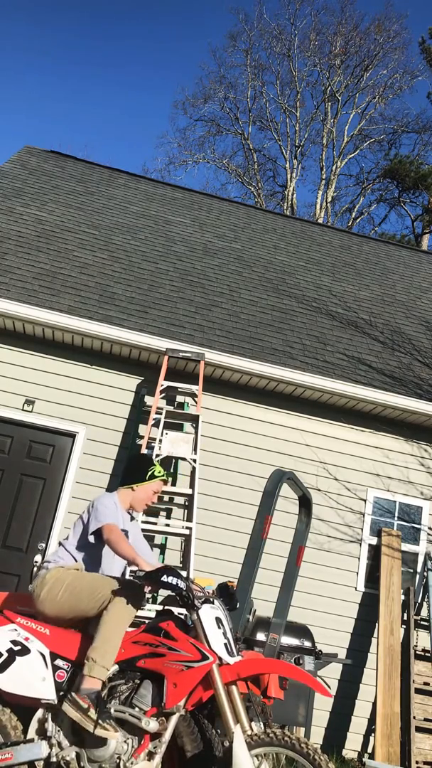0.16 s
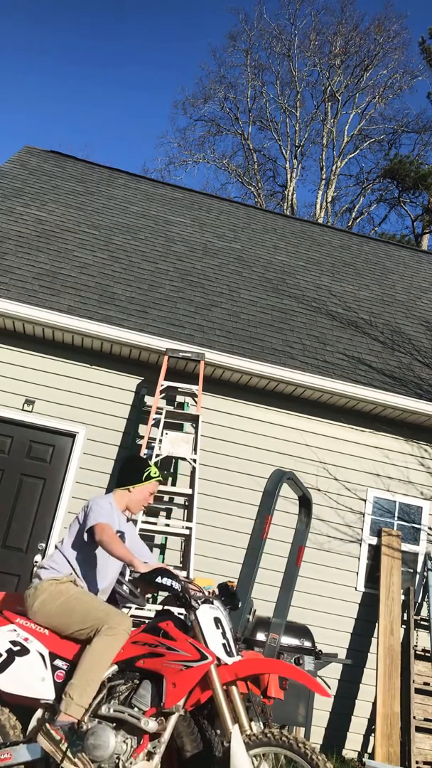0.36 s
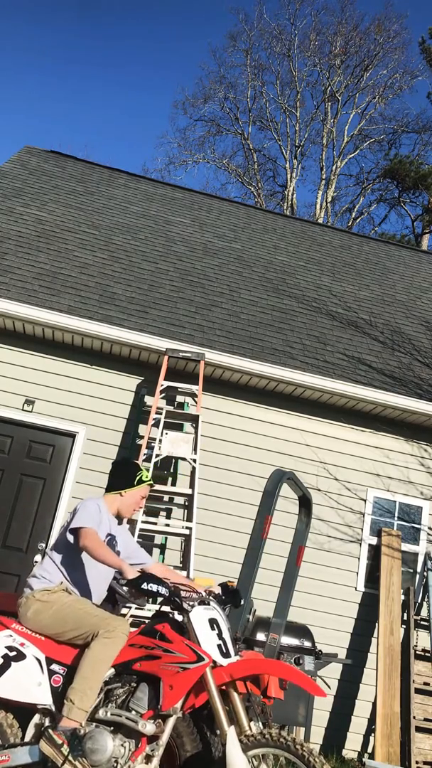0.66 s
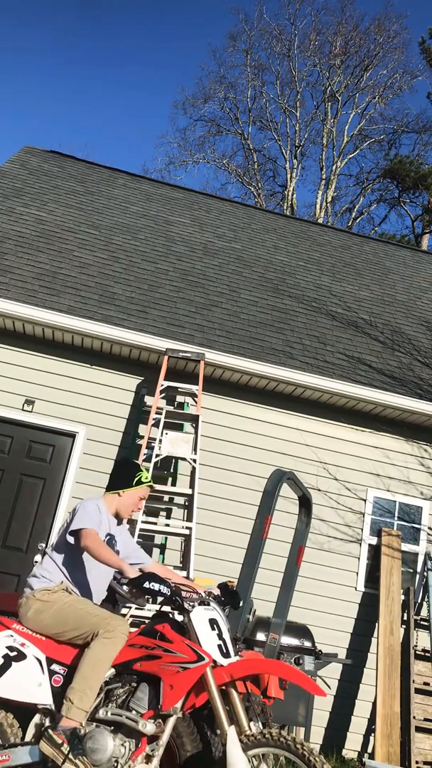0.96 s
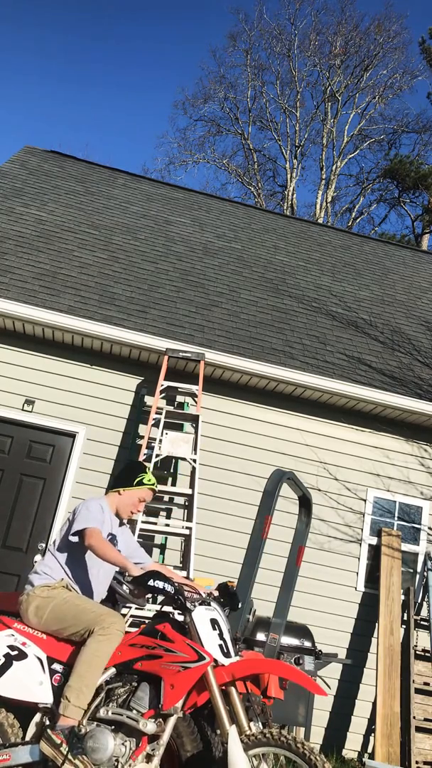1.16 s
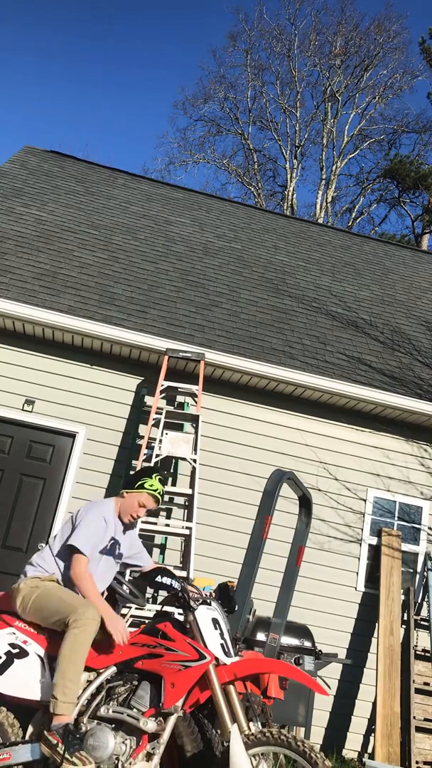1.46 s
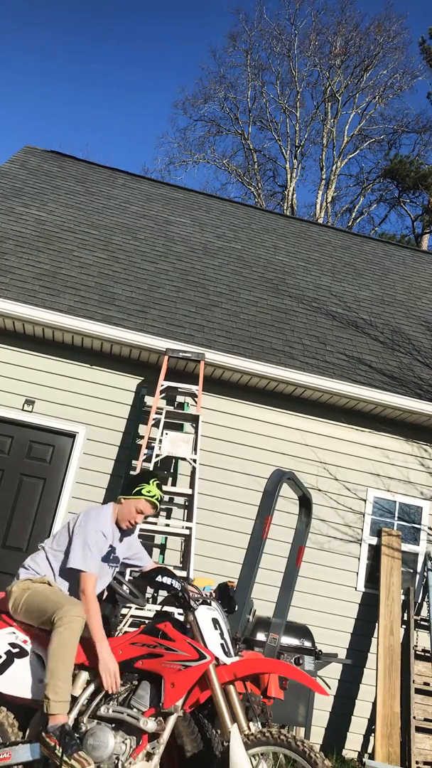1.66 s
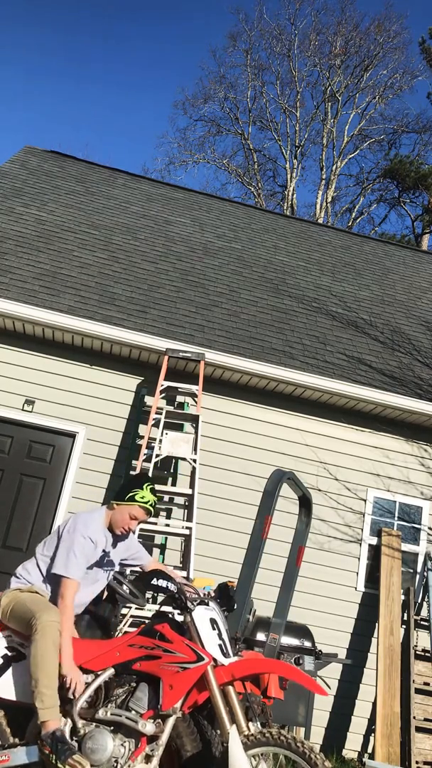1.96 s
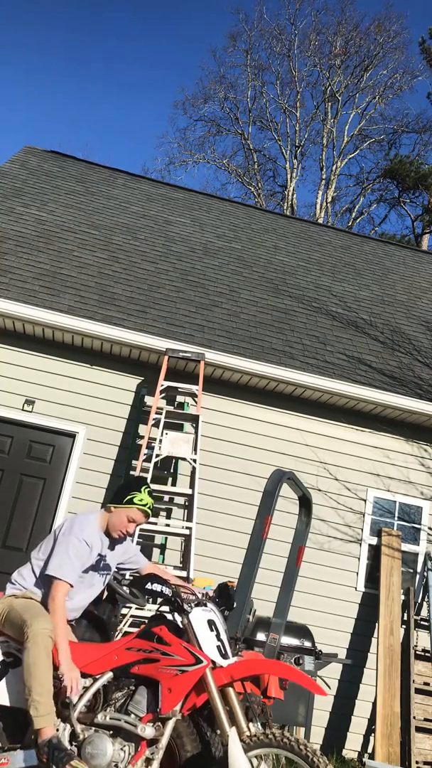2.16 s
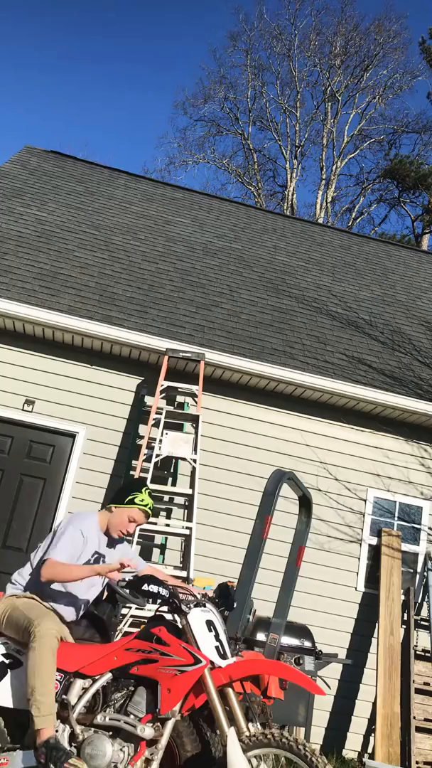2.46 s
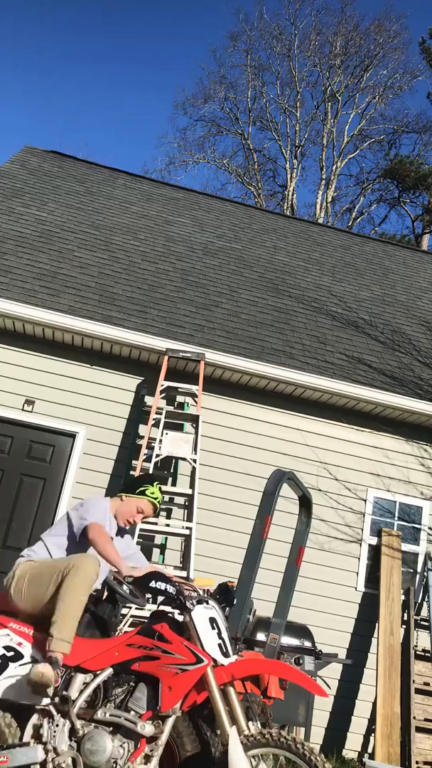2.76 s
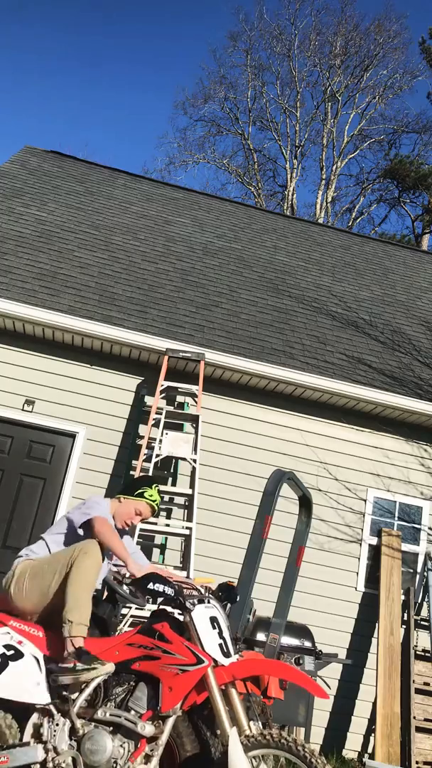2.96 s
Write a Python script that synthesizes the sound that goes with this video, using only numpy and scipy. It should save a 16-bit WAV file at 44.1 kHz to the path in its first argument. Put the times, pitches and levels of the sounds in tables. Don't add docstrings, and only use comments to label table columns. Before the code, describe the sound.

A small single-cylinder motorcycle engine is already turning at 0 s, punching fast, boomy exhaust thumps with valve clacks and gear chatter, slowing until it dies around 0.6 s with a bright, briefly ringing lever clank. Faint taps and cloth brushes follow near 1.2-1.4 s, a stick-slip seat creak at 1.6-1.85 s, then dull knocks at 2.0-2.55 and about 3 s. Low traffic hum fades; faint camera whine and ticks persist close by.

```python
import sys
import numpy as np
from scipy import signal
from scipy.fft import rfft, irfft, next_fast_len
from scipy.io import wavfile
from scipy.ndimage import uniform_filter1d, map_coordinates

SR = 44100
rng = np.random.default_rng(int(sys.argv[2]) if len(sys.argv) > 2 else 0)


def how_loud(loudness_db):
    steps = np.asarray(loudness_db, float) / 20
    return 10 ** steps


def int16_out(signal):
    q = np.round(np.clip(np.atleast_2d(signal).T, -1, 1) * 32767)
    wavfile.write(sys.argv[1], SR, q.astype(np.int16))


N = 136710
TIME = np.arange(N) / SR


def unit(x):
    return x / np.sqrt(np.mean(x ** 2) + 1e-20)


def filtered(x, response):
    size = next_fast_len(x.shape[-1] + SR // 2)
    hz = np.fft.rfftfreq(size, 1 / SR)
    return irfft(rfft(x, size) * response(hz), size)[:x.shape[-1]]


def resonant(x, peaks):
    def response(f):
        total = 0
        for k, (centre, width, db) in enumerate(peaks):
            damping = 1j * f * width
            total = total + (-1) ** k * how_loud(db) * damping / (centre * centre - f * f + damping)
        return total
    return filtered(x, response)


def wobble(rate):
    return map_coordinates(rng.standard_normal(int(N * rate / SR) + 4), [TIME * rate])


def hiss(spectrum, patchy_db):
    z = signal.stft(rng.standard_normal(N + 512), nperseg=512)[2]
    patches = uniform_filter1d(uniform_filter1d(rng.standard_normal(z.shape), 6, 0), 8, 1)
    x = signal.istft(z * how_loud(patchy_db * unit(patches)), nperseg=512)[1][:N]
    below = [(spectrum[0][0] * 0.25, -120)]
    above = [(spectrum[-1][0] * 1.3, -120)]
    hz, db = np.transpose(below + list(spectrum) + above)
    return unit(filtered(x, lambda f: how_loud(np.interp(np.log(f + 1), np.log(hz), db))))


def decay(start_s, db, t60_s, rise_s):
    t = np.maximum(TIME - start_s, 0)
    return how_loud(db - 60 * t / t60_s) * (1 - np.exp(-t / rise_s))


def curve(rows):
    return np.interp(TIME, [r[0] for r in rows], [r[1] for r in rows])


def rattle(start_s, peak_db, t60_s, rise_s, peaks, tail_db=-60):
    t = np.arange(SR // 5) / SR
    fade = how_loud(-60 * t / t60_s) + how_loud(tail_db - 15 * t / t60_s)
    contacts = rng.standard_normal(len(t)) * fade * (1 - np.exp(-t / rise_s))
    burst = resonant(contacts, peaks)
    return np.pad(how_loud(peak_db) * burst / np.abs(burst).max(), (round(start_s * SR), N))[:N]


def dull(x):
    air_hz = 8000
    return filtered(x, lambda f: 1 / (1 + 1j * f / air_hz) ** 3)


# time_s, level_db
TRAFFIC_LEVEL = [
    (.6, -36),
    (.77, -41.5),
    (.91, -48.5),
    (1.64, -49.5),
    (3.1, -51),
]
# hz, level_db (per Hz)
TRAFFIC_COLOUR = [(22, -35.5), (40, -12.5), (62, 0.5), (110, -8), (150, -15.5), (250, -23.5), (500, -53.5)]
# hz, level_db (per Hz)
YARD_COLOUR = [(300, -1.5), (650, -5), (1300, 0.5), (2200, -14), (3600, -16), (8000, -23), (13000, -23.5),
               (15800, -18)]


def outdoors():
    traffic = how_loud(curve(TRAFFIC_LEVEL)) * hiss(TRAFFIC_COLOUR, patchy_db=0.8)
    air_db = -64.5 + 0.5 * wobble(7.8)
    return traffic + how_loud(air_db) * hiss(YARD_COLOUR, patchy_db=0.5)


# start_s, end_s
DRIVE_PAUSES = [
    (1.195, 1.245),
    (1.845, 1.945),
    (2.475, 2.53),
]
# hz, width_hz, level_db
TICK_BODY = [(2960, 900, 0), (4300, 1000, 3), (7400, 2000, -5), (12500, 6000, -12)]


def camera():
    on = 1
    for start_s, end_s in DRIVE_PAUSES:
        on = on - np.clip((TIME - start_s) / 0.012, 0, 1) * np.clip((end_s - TIME) / 0.011, 0, 1)
    phase = 2 * np.pi * np.cumsum(7015 + 45 * wobble(120)) / SR
    tone = np.sin(phase) + how_loud(-11.5) * np.sin(2 * phase)
    whine = on * how_loud(-74 + 1.3 * wobble(100)) * tone

    tick_t60_s = 0.008
    ticks = 0
    for s in np.arange(0.7145, N / SR, 0.1024):
        ticks = ticks + rattle(s, -53.5, tick_t60_s, 0.00044, TICK_BODY)
    for s in np.arange(0.729, N / SR, 0.05):
        ticks = ticks + rattle(s, -63 + 3 * rng.normal(), tick_t60_s, 0.00022, [(2900, 550, 0)])

    every_s = 1 / 30
    gate = np.exp(-(((TIME - 0.015) % every_s - every_s / 2) / 0.003) ** 2)
    blips = gate * how_loud(-81 + 6 * wobble(30)) * np.sin(2 * np.pi * 10200 * TIME)
    return whine + ticks + blips


# middle_s, half_length_s, level_db, pitch_hz
CLOTH_RUBS = [
    (1.1, 0.06, -65, 1350),
    (1.39, 0.04, -63, 950),
    (1.4, 0.04, -67, 1450),
    (2.91, 0.06, -67, 540),
    (2.88, 0.08, -64, 870),
    (2.86, 0.1, -66, 1520),
]


def cloth_rubs():
    rubs = 0
    for middle_s, half_s, db, hz in CLOTH_RUBS:
        band = resonant(rng.standard_normal(N), [(hz, 0.15 * hz, 0)])
        band = resonant(band, [(hz, 0.1 * hz, 0)])
        rubs = rubs + how_loud(db) * np.exp(-((TIME - middle_s) / half_s) ** 2) * unit(band)
    wide = resonant(rng.standard_normal(N), [(1590, 590, 2), (3000, 1000, -1.5), (4800, 2000, -8)])
    return rubs + how_loud(-62.5) * np.exp(-((TIME - 2.36) / 0.055) ** 2) * unit(wide)


# time_s, level_db
SEAT_SCRAPE = [
    (1.592, -46),
    (1.64, -41),
    (1.69, -42),
    (1.72, -44),
    (1.76, -43),
    (1.82, -47.5),
    (1.87, -63),
]
# hz, width_hz, level_db
SEAT_BODY = [(352, 170, -12), (617, 49, -8.5), (834, 105, -6.5), (972, 37, 5.5), (1200, 36, -1.5),
             (1420, 60, -3.5), (2085, 290, -21.5)]
# start_s, peak_db
SEAT_SLIPS = [(1.566, -40), (1.594, -46), (1.5985, -39), (1.6115, -36), (1.626, -43), (1.633, -38),
              (1.6405, -35), (1.648, -36), (1.656, -34), (1.67, -39), (1.679, -32), (1.688, -43),
              (1.695, -41), (1.7035, -32), (1.712, -31), (1.72, -31), (1.7285, -32), (1.737, -33),
              (1.7455, -38), (1.755, -42), (1.763, -41), (1.773, -42), (1.782, -43), (1.795, -45),
              (1.808, -43), (1.82, -48), (1.835, -49)]


def seat_creak():
    def seat(x):
        return resonant(resonant(x, SEAT_BODY), [(1090, 2200, 0)])

    slips = np.zeros(N)
    for s, db in SEAT_SLIPS:
        slips[round((s - 0.0015) * SR)] = how_loud(db + 16)
    on = np.clip((TIME - SEAT_SCRAPE[0][0]) / 0.01, 0, 1)
    on = on * np.clip((SEAT_SCRAPE[-1][0] - TIME) / 0.024, 0, 1)
    scrape = on * how_loud(curve(SEAT_SCRAPE) - 9) * unit(seat(rng.standard_normal(N)))
    return 10 * seat(slips) + scrape


# start_s, peak_db, pitch_hz, brightness_db
FRAME_KNOCKS = [(.824, -52, 910, -15), (1.173, -43.5, 1200, -19), (1.176, -49.5, 1960, -22),
                (1.189, -57, 1430, -5), (1.256, -47, 1510, -18), (1.264, -56, 2000, -18),
                (1.737, -51.5, 2800, 2.5), (2.029, -34.5, 1380, -39), (2.045, -46, 975, -30),
                (2.168, -32.5, 1420, -8.5), (2.177, -36.5, 1210, -18), (2.212, -36.5, 1360, -20),
                (2.226, -34, 1290, -27), (2.469, -57, 1470, 0), (2.498, -34.5, 1790, -34),
                (2.546, -36, 1228, -25), (2.559, -55, 1320, -12), (2.814, -51, 1540, -22),
                (2.998, -35, 1270, -14), (3.036, -32.5, 1800, 3.5), (3.081, -29.5, 1495, -32),
                (3.088, -29.5, 1120, -26)]
# hz, width_hz, level_db
FRAME_BODY = [(290, 173, -6.5), (557, 230, -9.5), (1277, 280, -0.5), (1850, 210, -17.5)]
# hz, width_hz, level_db
METAL_RING = [(3000, 330, 1.5), (4220, 200, 3.5), (5700, 1100, 0.5), (8650, 1600, -3.5), (11400, 2700, -18)]


def rider_knocks():
    knocks = 0
    for s, db, hz, bright_db in FRAME_KNOCKS:
        knocks = knocks + rattle(s, db + 0.5, 0.044, 0.0002, FRAME_BODY + [(hz, 150, 3)], tail_db=-7.5)
        knocks = knocks + rattle(s, db + bright_db + 3.5, 0.017, 0.0001, METAL_RING)
    return dull(knocks)


# pitch_hz, level_db, t60_s
LEVER_RING = [(4538, -3, .7), (4775, -2, .45), (5873, 0, .16), (6142, -6, .3), (6304, -5, .2),
              (6900, -4, .25)]


def kick_lever():
    home_s = 0.5746
    crack = rattle(home_s, -18.5, 0.066, 0.00044, [(4570, 1140, 16), (6200, 840, 15.5), (8340, 1300, 7.5)])
    ring = 0
    for hz, db, t60_s in LEVER_RING:
        ring = ring + decay(home_s, -55 + db, t60_s, 0.0017) * np.sin(2 * np.pi * hz * TIME)
    return dull(crack) + ring


# time_s, level_db
GEAR_LEVEL = [
    (0, -33.5),
    (.2, -34),
    (.45, -36),
    (.53, -37.5),
    (.62, -47.5),
    (.7, -57),
    (.8, -70),
]
# hz, level_db (per Hz)
GEAR_COLOUR = [(300, 9), (650, -16.5), (1250, -1), (2400, -9.5), (5500, -24), (8000, -35.5), (15800, -52)]


def gear_clatter():
    stop = np.clip((0.85 - TIME) / 0.19, 0, 1)
    return how_loud(curve(GEAR_LEVEL) + 1.8 * wobble(89.9)) * hiss(GEAR_COLOUR, patchy_db=0.5) * stop


# start_s, peak_db, pitch_hz
VALVE_CLACKS = [(0.0189, -17, 1440), (0.0756, -12.5, 1970), (0.123, -19, 1550), (0.182, -10.5, 1210),
                (0.2293, -16, 1530), (0.2859, -10.5, 1185), (0.34, -15.5, 1140), (0.406, -15, 1200),
                (0.4662, -13, 1290), (0.53, -25, 1250), (0.5459, -18, 2040), (0.5682, -18, 1870),
                (0.575, -12.5, 1904), (0.58, -11.5, 1390), (0.6034, -20, 1340), (0.6448, -25, 1110),
                (0.6697, -37, 1480), (0.6837, -39.5, 1360)]
# hz, width_hz, level_db
CASE_BODY = [(1250, 367, 3), (1970, 405, 6.5), (2856, 300, -6.5), (4260, 460, -13.5), (6190, 440, -16),
             (9000, 2500, -36.5)]
# start_s, peak_db
TAPPET_TICKS = [(0.0766, -30), (0.124, -26), (0.179, -23.5), (0.228, -32), (0.284, -30), (0.2983, -26),
                (0.3388, -29.5), (0.404, -32), (0.4668, -28.5), (0.5346, -37), (0.5467, -38),
                (0.6448, -38.5), (0.667, -46)]
# hz, width_hz, level_db
TAPPET_BODY = [(4430, 350, -1.5), (6130, 1200, -9.5), (8500, 420, -14.5), (11000, 2500, -25)]


def valve_gear():
    clacks = 0
    for s, db, hz in VALVE_CLACKS:
        clacks = clacks + rattle(s, db - 3, 0.093, 0.0012, CASE_BODY + [(hz, 150, 8)])
    for s, db in TAPPET_TICKS:
        clacks = clacks + rattle(s, db + 1.5, 0.024, 0.0003, TAPPET_BODY)
    return dull(clacks)


# delay_s, level_db
WALL_ECHOES = [
    (.027, -7.5),
    (0.01316, -15),
]


def yard(x):
    echoes = 0
    for delay_s, db in WALL_ECHOES:
        echoes = echoes + how_loud(db) * np.pad(x, (round(delay_s * SR), 0))[:len(x)]
    return x + echoes


# start_s, level_db, sharpness_db
GAS_PULSES = [(-.0165, -7, 4.5), (0.036, -27, -5), (0.0875, -8, 5.5), (0.143, -26.5, 1), (0.1915, -8, 4.5),
              (0.2411, -11, 2), (0.2977, -8, 4.5), (0.3527, -11.5, -0.5), (0.4188, -9, 2),
              (0.4828, -11.5, -2.5), (0.574, -23.5, -1.5)]
# hz, width_hz, level_db
PIPE_MODES = [(73.6, 13.2, 2), (105.8, 30, -1), (138.6, 9.8, -5.5), (58.4, 24, -12.5)]
# hz, width_hz, level_db
SILENCER_SHELL = [(264.6, 12, 12.5), (314, 18, 2), (354.6, 8.2, 1), (500, 13, -33)]
# hz, width_hz, level_db
TAIL_PIPE = [(259, 172, 6), (412, 108, 4)]
# hz, level_db (per Hz)
BLOWDOWN_COLOUR = [(450, 1), (900, 5), (1400, 5), (2400, -11.5), (6600, -20), (8000, -29), (12000, -40),
                   (15800, -53)]
# hz, level_db (per Hz)
JET_COLOUR = [(5000, -10), (8500, -6), (12000, -9.5), (15800, -7)]


def exhaust():
    lead = SR // 10
    low, high = np.zeros((2, N + lead))
    gas, jet = 0, 0
    for s, db, sharp_db in GAS_PULSES:
        low[round((s + 0.0004) * SR) + lead] = how_loud(db)
        high[round(s * SR) + lead] = how_loud(db + sharp_db)
        gas = gas + decay(s, db + sharp_db - 20.5, 0.19, 0.0054)
        jet = jet + decay(s, 2 * db + sharp_db - 42.5, 0.074, 0.0012)
    port = yard(resonant(high, TAIL_PIPE))
    for mode in SILENCER_SHELL:
        port = port - resonant(high, [mode])
    thump = how_loud(56.5) * resonant(low, PIPE_MODES) + how_loud(35.5) * port
    soft_hz = 530
    soft = filtered(thump, lambda f: 1 / (1 + 1j * f / soft_hz) ** 2)[lead:]
    return soft + gas * hiss(BLOWDOWN_COLOUR, patchy_db=2) + jet * hiss(JET_COLOUR, patchy_db=2)


def scene():
    background = outdoors() + camera()
    rider = cloth_rubs() + seat_creak() + rider_knocks()
    engine = kick_lever() + gear_clatter() + valve_gear() + exhaust()
    return (background + rider + engine)[None]


# hz, width_hz, level_db
CASE_DIPS = [(3610, 330, -6), (7860, 200, -5)]


def microphone(x):
    def response(f):
        dips_db = sum(db * np.exp(-((f - hz) / width) ** 2) for hz, width, db in CASE_DIPS)
        return how_loud(dips_db) * (1j * f / (42.4 + 1j * f)) ** 2
    return filtered(x, response)


def top_cut(x):
    return signal.sosfilt(signal.butter(12, 15830, fs=SR, output="sos"), x)


def record(dry):
    mix = microphone(dry[0])[None]
    return top_cut(mix)


dry = scene()
out = record(dry)
int16_out(out)
```